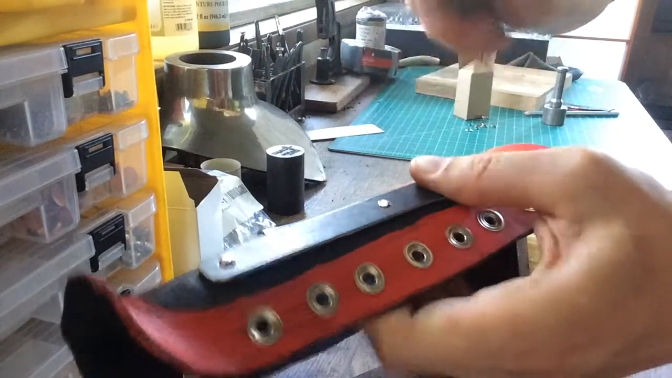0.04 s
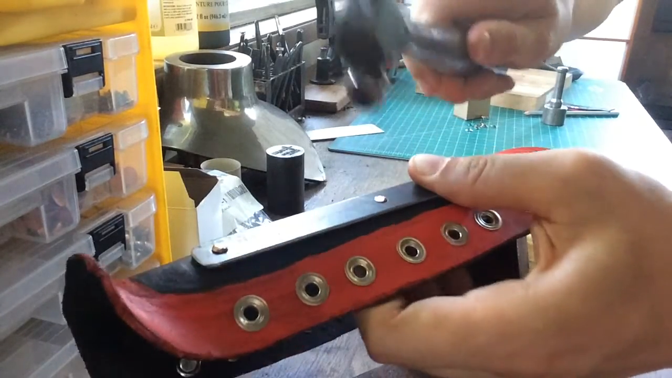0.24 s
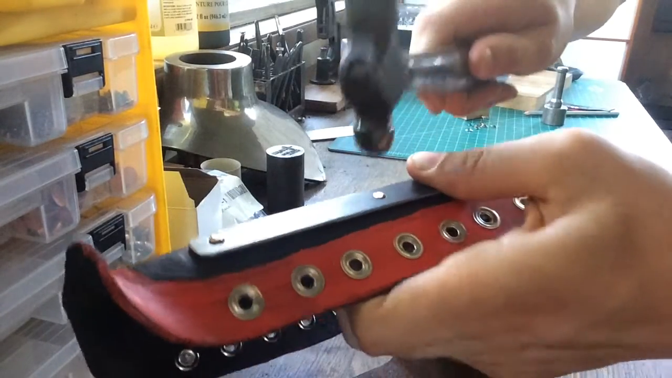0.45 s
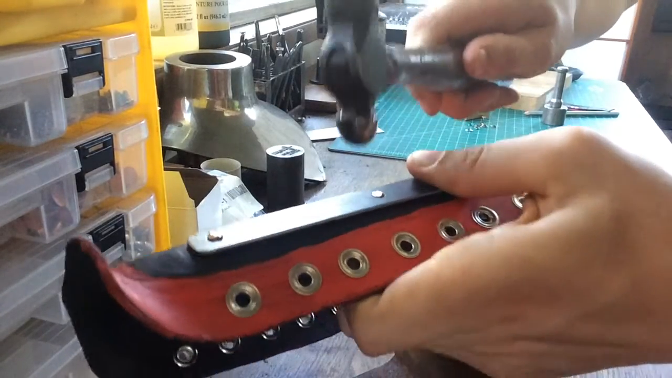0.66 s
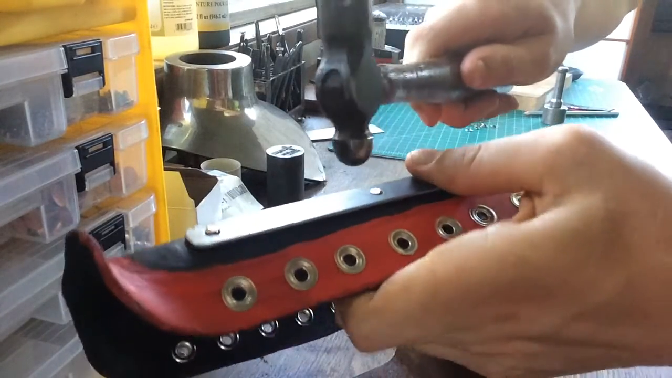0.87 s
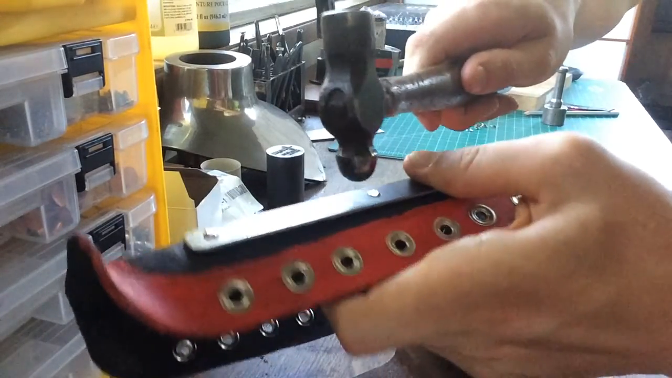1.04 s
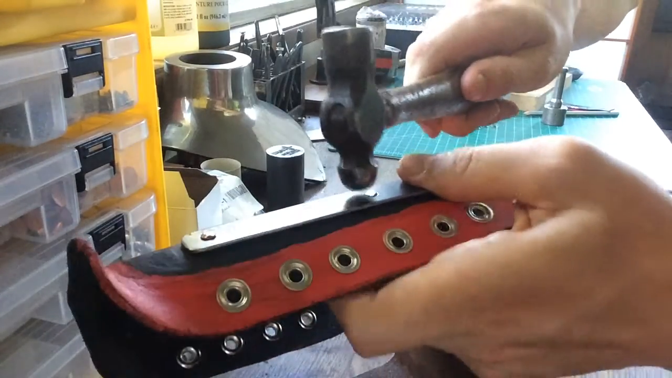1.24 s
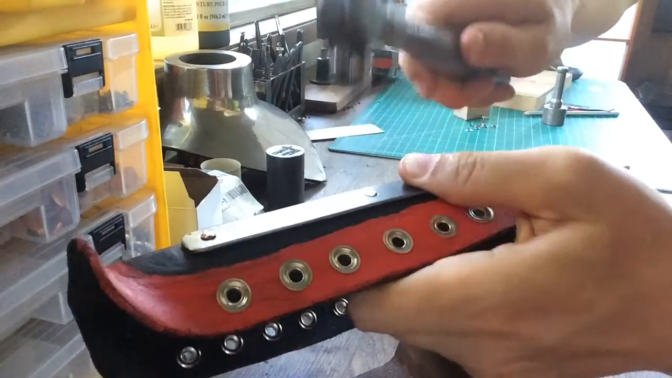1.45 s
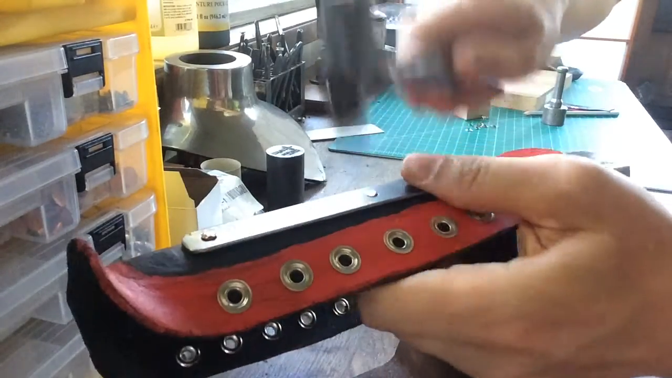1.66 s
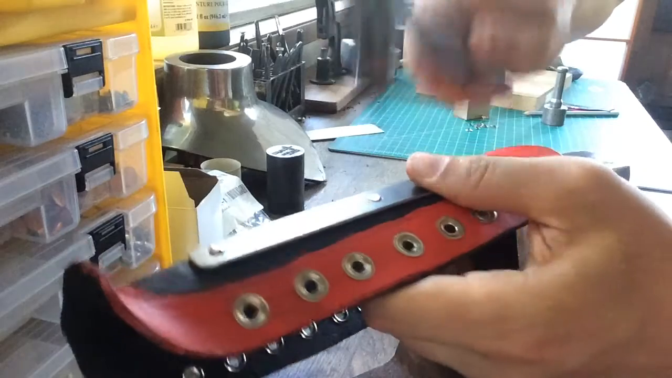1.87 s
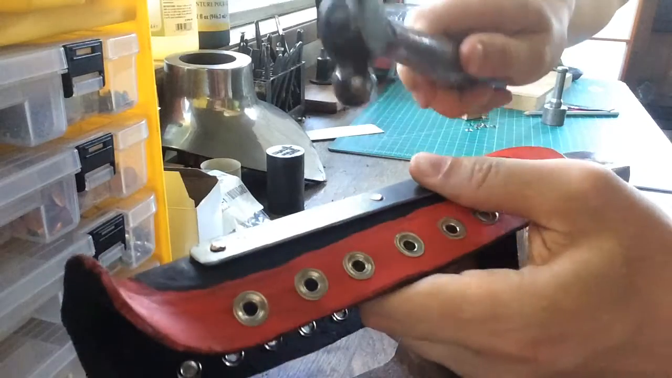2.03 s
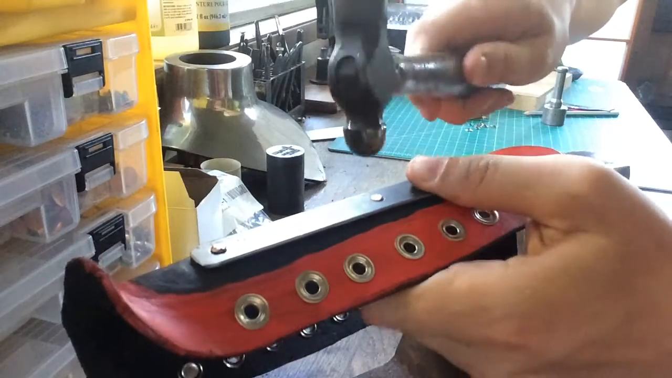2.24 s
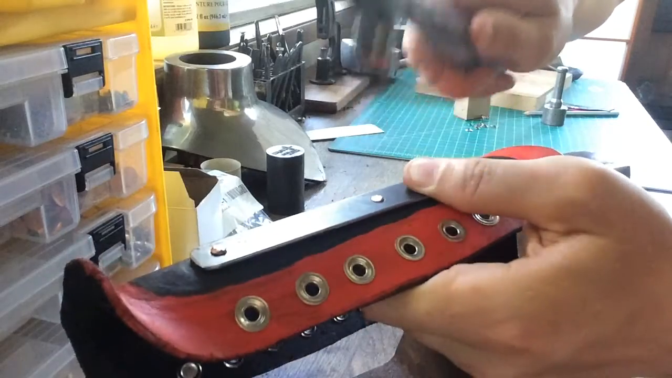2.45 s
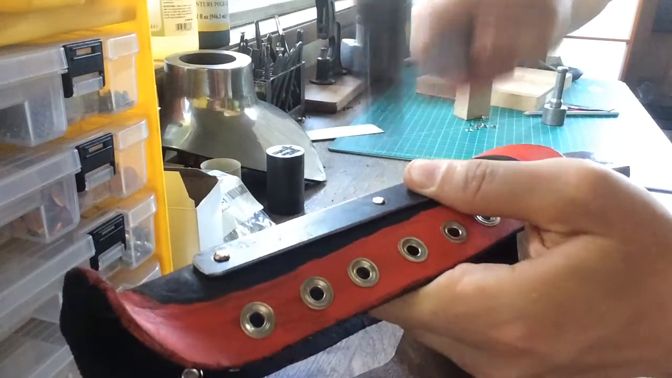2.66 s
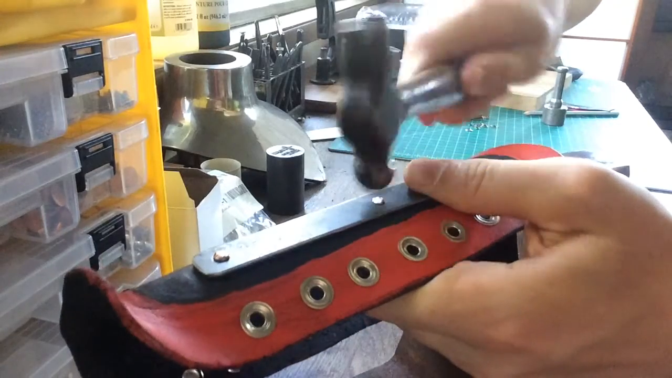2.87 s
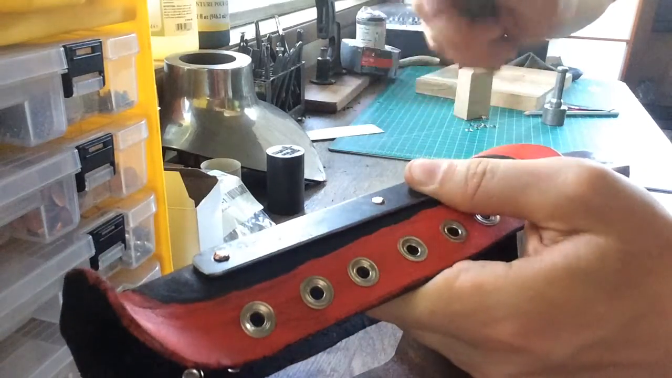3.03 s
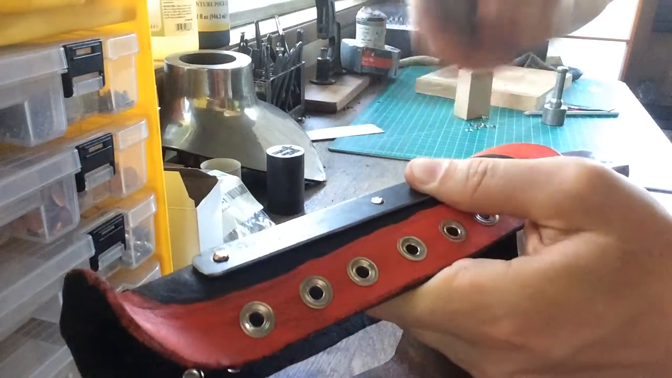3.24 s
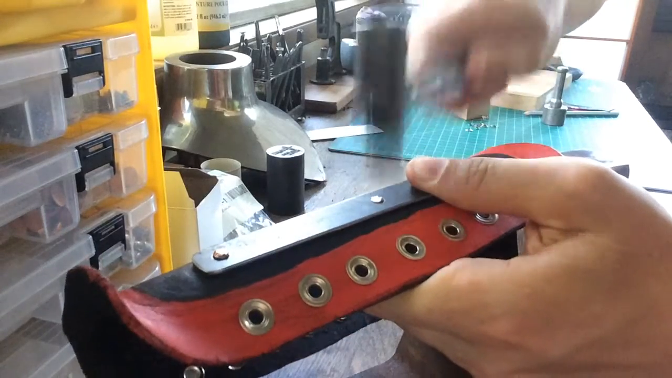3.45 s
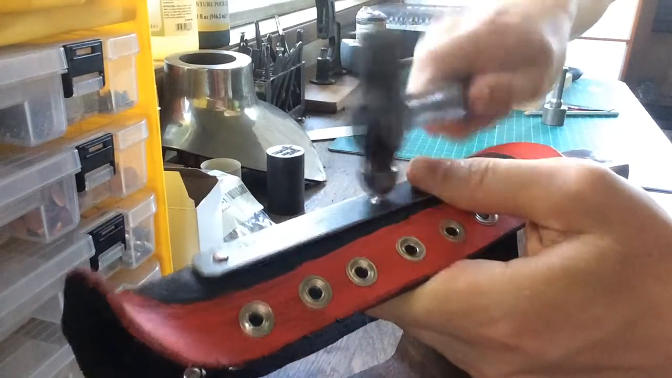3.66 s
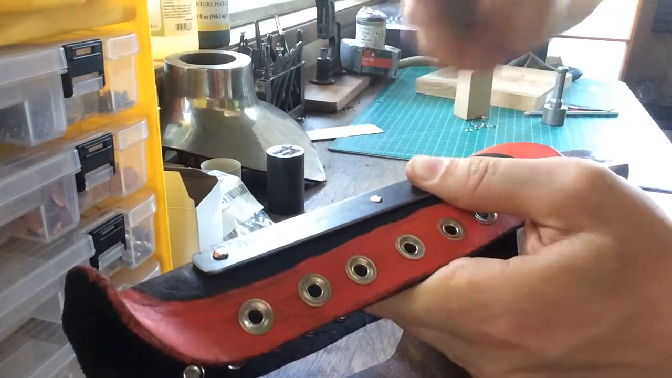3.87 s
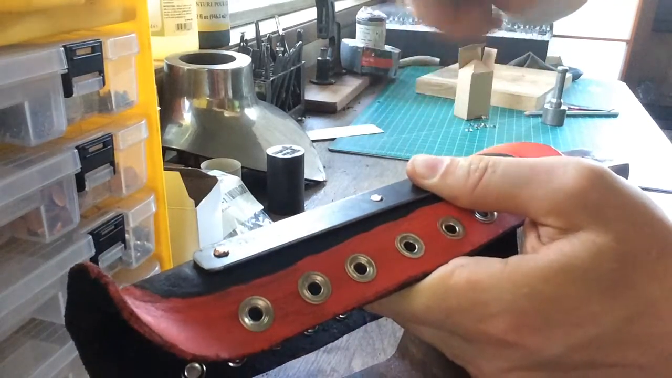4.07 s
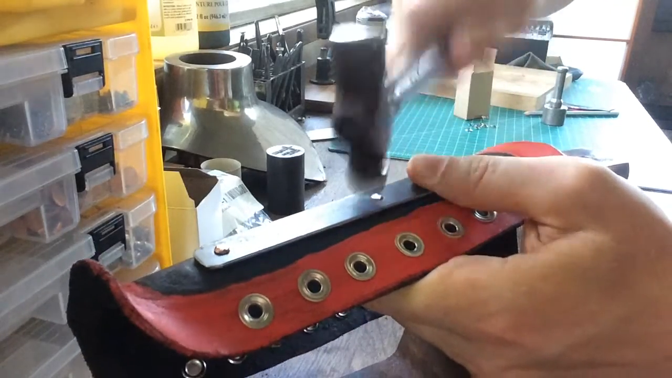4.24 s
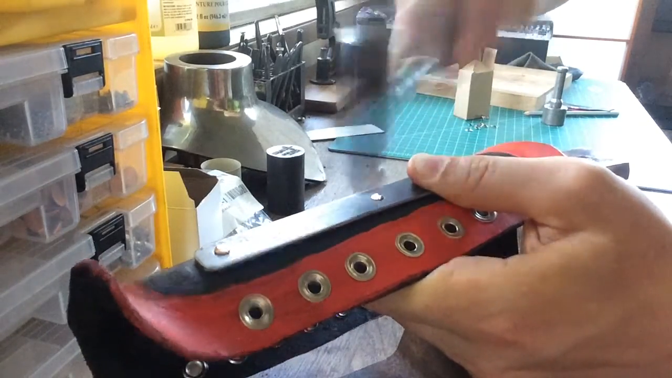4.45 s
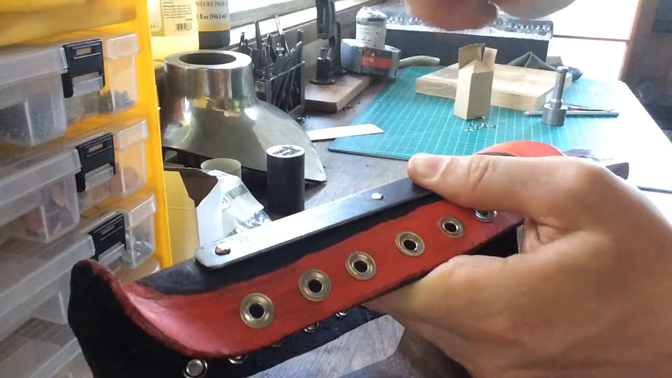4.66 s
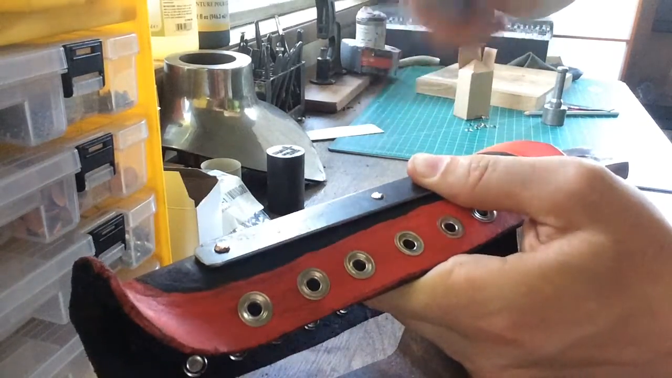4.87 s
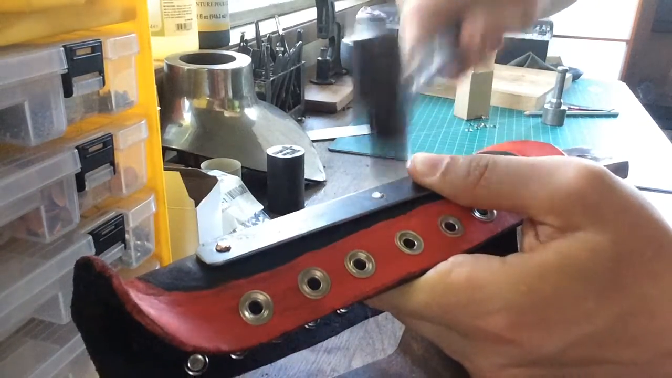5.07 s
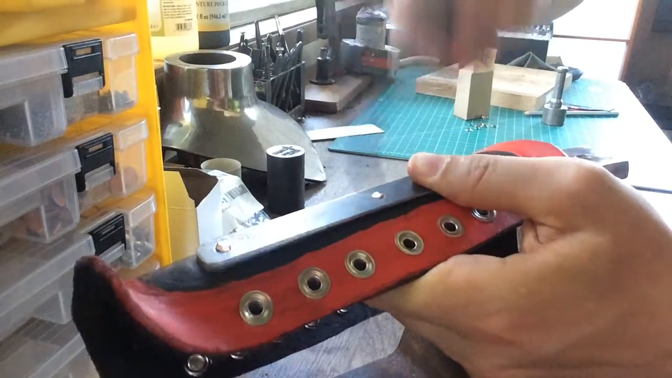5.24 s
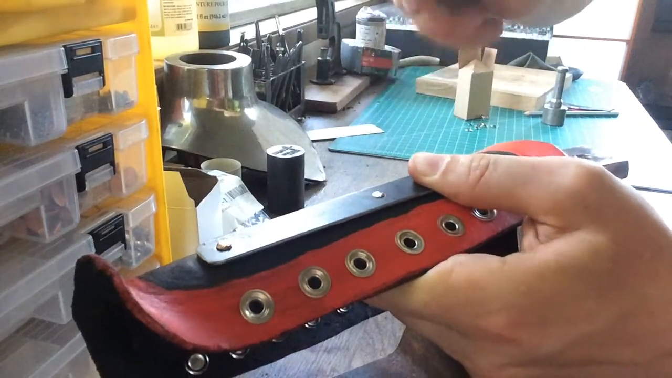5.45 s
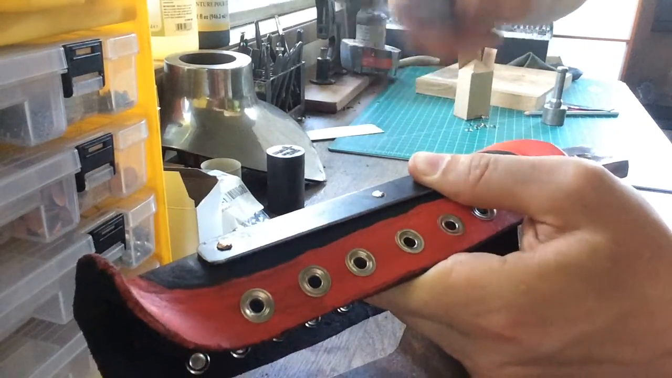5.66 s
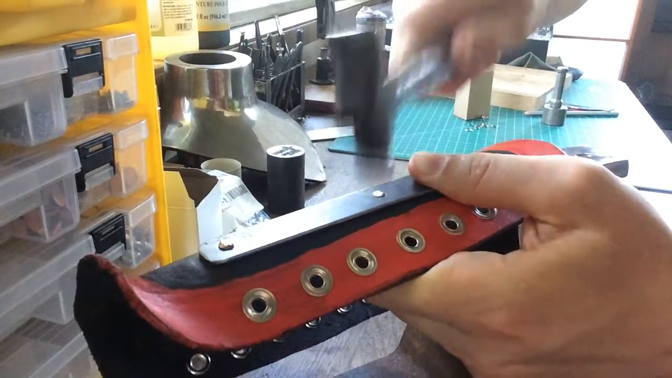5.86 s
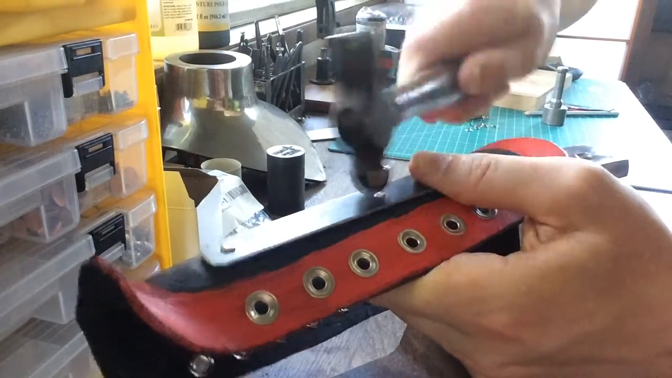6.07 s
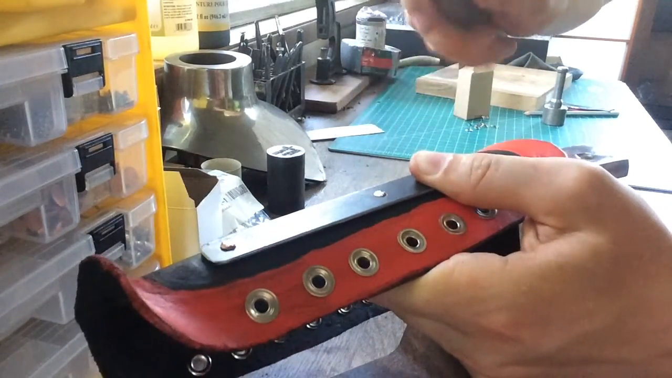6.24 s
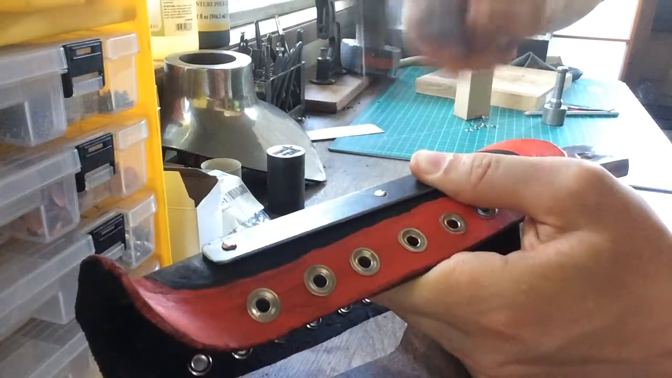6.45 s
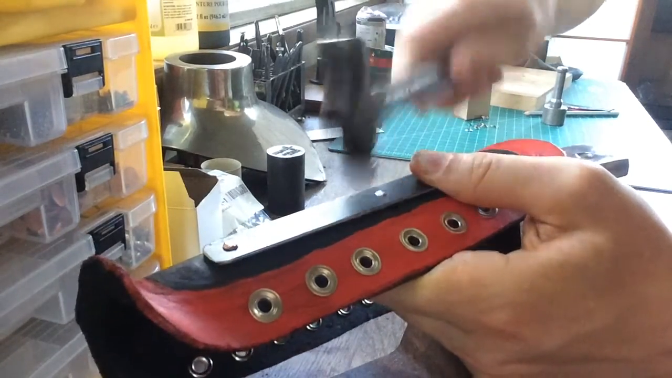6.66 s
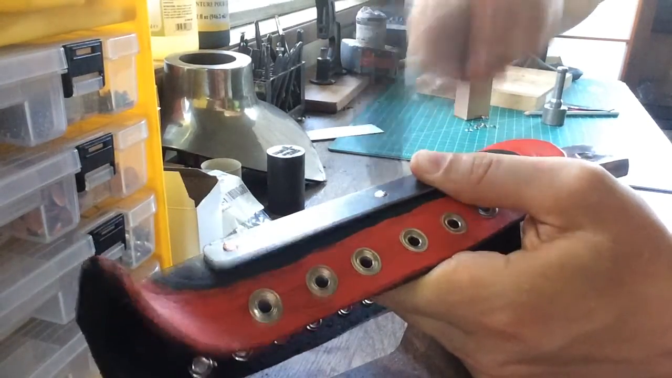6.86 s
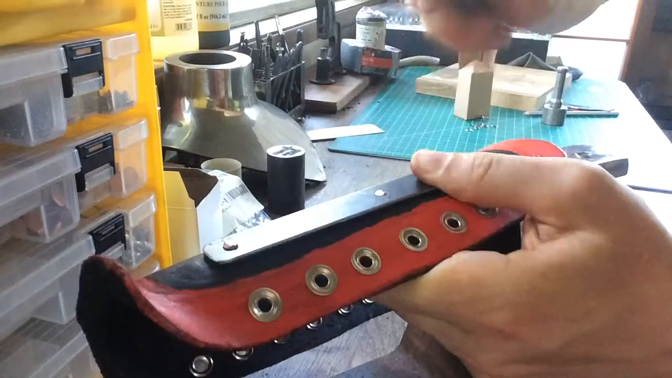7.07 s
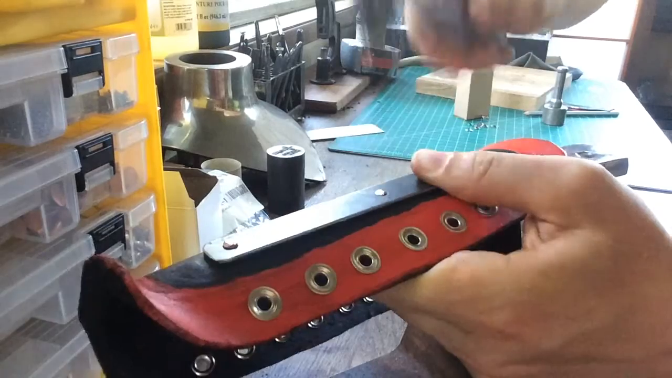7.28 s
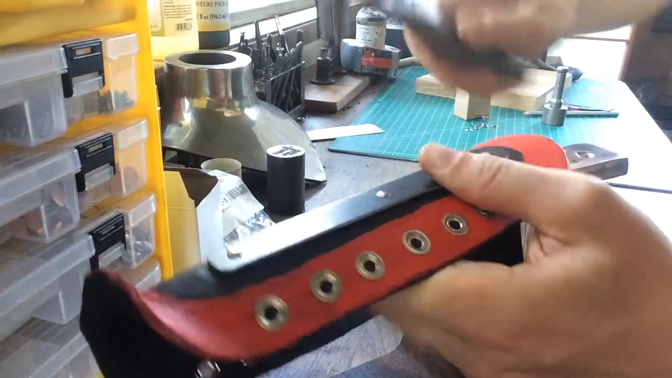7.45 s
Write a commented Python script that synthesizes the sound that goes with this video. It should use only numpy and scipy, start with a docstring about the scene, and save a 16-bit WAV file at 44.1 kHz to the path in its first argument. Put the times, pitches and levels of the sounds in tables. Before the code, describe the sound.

In a small workshop, the tail of a hammer blow dies away, followed by soft bumps and tiny metal scrapes. A faint touch and a light tap lead to two firmer, lower-pitched knocks, then steady hard blows nearly four times a second until the end. Each is a bright crack and damped clank with a short rebound. The microphone is close, its loud peaks held down.

```python
"""In a workshop, a ball-peen hammer sets a copper rivet through a steel plate and leather, held on the horn of
a small bench anvil. One blow dies away, the work is nudged, then three trial taps lead to a steady run of blows.
Each is a noise-burst crack and clank, damped modes of plate, anvil, hammer and bench, and a small rebound.
The workshop answers with decaying noise, over quiet air; the close microphone's limiter holds the peaks down."""
import sys
import numpy as np
from scipy import signal
from scipy.fft import rfft, irfft, next_fast_len
from scipy.io import wavfile
from scipy.ndimage import uniform_filter1d, minimum_filter1d, map_coordinates

SR = 44100
rng = np.random.default_rng(int(sys.argv[2]) if len(sys.argv) > 2 else 0)


def master(y):
    """Save y as 16-bit WAV."""
    cut = np.clip(np.atleast_2d(y).T, -1, 1)
    pcm = np.round(cut * 32767)  # scale
    wavfile.write(sys.argv[1], SR, pcm.astype(np.int16))


N = 331191
T = np.arange(int(SR * .6)) / SR  # s, time axis of every single sound

# Reference levels of an ordinary blow; each sound adds its own offset.
KNOCK_DB, THUD_DB, BENCH_DB, CLANK_DB, CRACK_DB, ROOM_DB = -16, -27, -26, -18.5, -35, -34


def amp(db):
    """Decibels to gain."""
    return 10 ** (np.asarray(db) / 20)


def along(points, hz):
    """(Hz, value) points read on a log axis."""
    point_hz, value = np.transpose(points)
    return np.interp(np.log(hz + 1), np.log(point_hz), value)


def filtered(x, gain):
    """x times a gain that depends on frequency."""
    size = next_fast_len(len(x) + 8192)
    hz = np.fft.rfftfreq(size, 1 / SR)
    return irfft(rfft(x, size) * gain(hz), size)[:len(x)]


def ripple(depth_db, step_hz):
    """A random gain over frequency: no two blows stir the same modes."""
    knots = rng.standard_normal(int(SR / step_hz) + 2)
    return lambda hz: amp(depth_db * np.interp(hz / step_hz, np.arange(len(knots)), knots))


def wobble(rate_hz, size):
    """A smooth random curve, rate_hz knots a second."""
    knots = rng.standard_normal(int(size * rate_hz / SR) + 4)
    return map_coordinates(knots, [np.arange(size) * rate_hz / SR])


def noise(spectrum, size, ripple_db=0):
    """Coloured noise of rms 1."""
    uneven = ripple(ripple_db, step_hz=68.38)
    x = filtered(rng.standard_normal(size), lambda hz: amp(along(spectrum, hz)) * uneven(hz))
    return x / x.std()


def fade(t60_s, attack_s):
    """A quick swell and an exponential decay."""
    decay = np.exp(-np.log(1000) * T / t60_s)
    return decay * (1 - np.exp(-T / attack_s))


def burst(spectrum, t60_s, attack_s):
    """Many close modes that die together."""
    return noise(spectrum, len(T), ripple_db=5.5) * fade(t60_s, attack_s)


def mode(hz, t60_s, attack_s):
    """One damped vibration."""
    return np.sin(2 * np.pi * hz * T) * fade(t60_s, attack_s)


def ring(modes, scatter_db, attack_s):
    """A body's modes: where the blow lands and how the hand grips shift their strength and pitch."""
    total = np.zeros(len(T))
    for hz, db, t60_s in modes:
        strength = amp(db + scatter_db * rng.normal()) * rng.choice([-1, 1])
        total += strength * mode(hz * rng.normal(1, .002), t60_s, attack_s)
    return total


def add(track, s, x):
    """Mix x into the track from time s."""
    i = round(s * SR)
    x = x[max(-i, 0):max(N - i, 0)]
    track[max(i, 0):][:len(x)] += x


# Spectrum of steel on copper. Each row: frequency in Hz, density in dB per Hz.
CRACK_SPECTRUM = [(500, -26), (2000, -13), (4000, 0), (7000, 3.5), (11000, 0.5), (15000, -4)]


def crack(track, s, crack_db):
    """Steel meets copper: a short bright burst and one high mode."""
    add(track, s, amp(crack_db + 14) * burst(CRACK_SPECTRUM, t60_s=.014, attack_s=.0004))
    add(track, s + .001, amp(crack_db + 10.5) * mode(3900, t60_s=.018, attack_s=.0004))


HEAD_DB = -7.5  # against the mean of the crack and room levels
# The hammer head. Each row: frequency in Hz, level in dB, t60 in s.
HEAD_MODES = [(5625, -12, .3), (5965, -1, .16), (6110, -4, .14), (6820, -1, .2), (7553, -4, .15),
              (7827, -3, .1), (8325, -8, .22), (9827, -2, .24), (11886, -7, .26)]


def hammer_head(track, s, room_db, crack_db):
    """The hammer head rings in its own high modes."""
    db = (room_db + crack_db) / 2 + HEAD_DB
    add(track, s, amp(db) * ring(HEAD_MODES, scatter_db=3, attack_s=.0005))


PING_DB, PING_SCATTER_DB = -68, 4  # reference level and its scatter from blow to blow


def ping(track, s, force_db):
    """A thin ping in the steel that comes and goes from blow to blow."""
    ping_db = PING_DB + force_db + PING_SCATTER_DB * rng.normal()
    add(track, s, amp(ping_db + 20) * mode(4650, t60_s=.36, attack_s=.0005))


def thud(track, s, thud_db):
    """A low thud goes into the bench."""
    add(track, s + .00042, amp(thud_db + 11.5) * mode(165, t60_s=.027, attack_s=.0025))


# Spectrum of the clank. Each row: frequency in Hz, density in dB per Hz.
CLANK_SPECTRUM = [(500, -6.5), (950, 1.5), (1200, -5.5), (1900, -6), (3500, -19.5), (5000, -15.5),
                  (9000, -32)]
# The steel plate, pressed against the leather. Each row: frequency in Hz, level in dB, t60 in s.
PLATE_MODES = [(1528, -2, 0.027), (2016, 0, 0.012), (2680, -3.5, 0.016), (3460, -1.5, 0.0097),
               (4505, -3.5, 0.0084)]


def clank(track, s, clank_db):
    """The plate clanks, soon damped by leather and hand."""
    add(track, s + .0005, amp(clank_db + 6) * burst(CLANK_SPECTRUM, t60_s=.027, attack_s=.00047))
    add(track, s + .0013, amp(clank_db + 3.5) * ring(PLATE_MODES, scatter_db=1, attack_s=.0003))


PUSH_DB, PUSH_HZ, SPRING_BACK_S = 5.5, 410, .0105  # push level is over the bench level
# The bench top. Each row: frequency in Hz, level in dB, t60 in s.
BENCH_MODES = [(116, -13, .35), (143, -11, .4), (200, -11, .3), (314, -2, .33), (339, -2, .27),
               (416, -7, .2), (520, -2, .11), (680, -4, .1), (902, -7, .1)]


def bench(track, s, bench_db, room_db):
    """The bench gives, springs back against the anvil and drones on in its modes."""
    add(track, s + .00091, amp(bench_db + PUSH_DB) * mode(PUSH_HZ, t60_s=.013, attack_s=.00092))
    add(track, s + SPRING_BACK_S, amp(bench_db + 11) * mode(408, t60_s=.054, attack_s=.00016))
    add(track, s + SPRING_BACK_S, amp(bench_db + 6.5) * mode(566, t60_s=.025, attack_s=.00055))
    add(track, s + .00395, amp(room_db + 11) * ring(BENCH_MODES, scatter_db=2.5, attack_s=.003))


USUAL_KNOCK_HZ, KNOCK_DB_PER_OCTAVE = 739, 3


def knock(track, s, knock_db, hz):
    """The anvil knocks on its seat, its pitch set by how firmly the work lies; a deeper knock is louder."""
    deeper_octaves = np.log2(USUAL_KNOCK_HZ / hz)
    level_db = knock_db + 12 + KNOCK_DB_PER_OCTAVE * deeper_octaves
    add(track, s + .001, amp(level_db) * mode(hz, t60_s=.027, attack_s=.0008))


# The anvil, damped by the leather. Each row: frequency in Hz, level in dB, t60 in s.
ANVIL_MODES = [(1333, -11, .09), (1448, -12, .16), (1575, -6, .06), (2005, -5, .07), (2358, -13, .08),
               (2894, -11, .11), (3220, -15, .07), (4430, -16, .07), (4620, -19, .08)]


def anvil(track, s, room_db):
    """The anvil's own modes, driven through the leather."""
    add(track, s + .001014, amp(room_db + 14.5) * ring(ANVIL_MODES, scatter_db=3, attack_s=.00018))


# Spectrum of the workshop's answer. Each row: frequency in Hz, density in dB per Hz.
TAIL_SPECTRUM = [(25, -23.5), (60, -2), (130, -2), (300, 8), (600, 5.5), (1000, 0), (1600, -2.5),
                 (3000, -7.5), (5300, -17.5), (8000, -21), (12000, -24), (15000, -25)]
# How fast the workshop's answer dies. Each row: frequency in Hz, t60 in s.
WORKSHOP_DECAY = [(60, 0.32), (160, 0.43), (420, 0.32), (1100, 0.46), (3000, 0.41), (7500, 0.44),
                  (15000, 0.3)]


def room_tail(build_s, clump_db):
    """Echoes arrive in clumps, and each frequency dies at its own speed."""
    steady = noise(TAIL_SPECTRUM, len(T), ripple_db=2)
    hz, t, bands = signal.stft(steady, SR, nperseg=256)
    decay = np.exp(-np.log(1000) * t / along(WORKSHOP_DECAY, hz)[:, None])
    tail = signal.istft(bands * decay, SR, nperseg=256)[1][:len(T)]
    return tail * (1 - np.exp(-T / build_s)) * amp(clump_db * wobble(240, len(T)))


# Spectrum of the hanging bass. Each row: frequency in Hz, density in dB per Hz.
BOOM_SPECTRUM = [(30, -22.5), (70, 2.5), (130, 0), (250, -4.5), (400, -5), (900, -41.5)]


def room(track, s, room_db, crack_db, thud_db):
    """The room answers: a sharper crack leaves more treble hanging in it, a heavier thud more bass."""
    add(track, s + .003, amp(room_db + 12.5) * room_tail(build_s=.0025, clump_db=-1))
    add(track, s + .0028, amp(crack_db - 14.5) * burst(CRACK_SPECTRUM, t60_s=.41, attack_s=.0024))
    add(track, s + .008, amp(thud_db - 9) * burst(BOOM_SPECTRUM, t60_s=.31, attack_s=.0047))


# Copper yields this far below an ordinary blow; under that, contact grows by the slope.
YIELD_DB, CONTACT_DB_PER_FORCE_DB = 9.5, .8
# What goes into the bench as a thud is missing from the knock.
KNOCK_LOSS_DB_PER_THUD_DB, BENCH_GAIN_DB_PER_THUD_DB = .25, .33
# The blows; force, thud and crack are relative to an ordinary blow of the run.
# Each row: start in seconds, force in dB, knock in Hz, thud in dB, crack in dB.
BLOWS = [(-.125, -3.5, 718, 5, 8), (1.007, -46, 650, 4, -2), (1.2718, -27.5, 435, 6, 10),
         (1.6719, -9.5, 440, 4.5, -1), (2.6481, -7.5, 474, 10, 5.5), (2.926, -.5, 710, 1, -11),
         (3.2004, 1, 712, -3, -9), (3.4641, 1.5, 715, -8, -1), (3.732, 1.5, 696, -5, -2),
         (3.9972, -.5, 756, -4, 0), (4.278, 0, 705, 0, 3.5), (4.543, -1, 720, -1, -2),
         (4.8092, -3, 667, 12, 6), (5.0751, -3, 748, 4, -10), (5.3457, -1, 708, -11, 6),
         (5.605, .5, 733, 2, 7), (5.8743, 1, 726, 3, 4), (6.136, .5, 743, -6, -1), (6.405, .5, 715, -9, 5),
         (6.6771, -1, 590, 9, 0), (6.9622, -1, 780, 10, -7), (7.2234, 0, 590, 9, 7)]


def hammer():
    """Each blow runs from rivet through anvil into bench and room; yielding copper caps the contact."""
    out = np.zeros(N)
    for s, force, knock_hz, thud_extra, crack_extra in BLOWS:
        contact = CONTACT_DB_PER_FORCE_DB * min(force + YIELD_DB, 0)
        crack_db = CRACK_DB + contact + crack_extra
        thud_db = THUD_DB + contact + thud_extra
        room_db = ROOM_DB + force
        crack(out, s, crack_db)
        hammer_head(out, s, room_db, crack_db)
        ping(out, s, force)
        thud(out, s, thud_db)
        clank(out, s, CLANK_DB + contact)
        bench(out, s, BENCH_DB + contact + BENCH_GAIN_DB_PER_THUD_DB * thud_extra, room_db)
        knock(out, s, KNOCK_DB + contact - KNOCK_LOSS_DB_PER_THUD_DB * thud_extra, knock_hz)
        anvil(out, s, room_db)
        room(out, s, room_db, crack_db, thud_db)
    return out


HOP_S = .017  # flight after a usual knock
REBOUND_DB, REBOUND_DB_PER_FORCE_DB, REBOUND_DB_PER_CRACK_DB = -28, .58, .44


def bounces():
    """A lighter, bright second contact with some plate; a firmer seat throws the hammer higher."""
    out = np.zeros(N)
    for s, force, knock_hz, _, crack_extra in BLOWS:
        lands_s = s + HOP_S * knock_hz / USUAL_KNOCK_HZ
        db = REBOUND_DB + REBOUND_DB_PER_FORCE_DB * force + REBOUND_DB_PER_CRACK_DB * crack_extra
        add(out, lands_s, amp(db + 3) * burst(CRACK_SPECTRUM, t60_s=.035, attack_s=.0002))
        add(out, lands_s, amp(db + 3) * ring(PLATE_MODES, scatter_db=1, attack_s=.00014))
    return out


# Spectrum of the workshop air. Each row: frequency in Hz, density in dB per Hz.
AIR_SPECTRUM = [(20, -15), (50, 1.5), (100, 9), (200, -7.5), (420, -3), (900, -12.5), (3000, -16),
                (5500, -18), (8000, -23.5), (12000, -24.5), (15000, -40)]


def workshop_air():
    """Quiet coloured noise, slightly restless in level."""
    return amp(-69 + 1.3 * wobble(6, N)) * noise(AIR_SPECTRUM, N)


# The work shifts on the horn and the hammer grazes it.
# Each row: start in seconds, bump in dB, tick in dB.
NUDGES = [(.133, -43, -72), (.165, -56, -62), (.298, -70, -57), (1.023, -60, -56), (2.138, -60, -68),
          (2.428, -62, -74)]


def handling():
    """Soft bumps into the bench and small scrapes of steel as the leather is lined up."""
    out = np.zeros(N)
    for s, bump_db, tick_db in NUDGES + fidgets(count=4):
        add(out, s, amp(bump_db + 2) * mode(118, t60_s=.15, attack_s=.0025))
        add(out, s, amp(bump_db + 7.5) * mode(470, t60_s=.016, attack_s=.00016))
        add(out, s, amp(bump_db - 14) * burst(BOOM_SPECTRUM, t60_s=1.0, attack_s=.0034))
        add(out, s, amp(tick_db + 6.5) * burst(CLANK_SPECTRUM, t60_s=.048, attack_s=.0022))
        add(out, s + .003, amp(tick_db + 5) * ring(PLATE_MODES, scatter_db=2, attack_s=.002))
    return out


FIDGET_FROM_S, FIDGET_TO_S = .9, 2.6
FIDGET_BUMP_DB, FIDGET_TICK_DB, FIDGET_SCATTER_DB = -66, -73, 2


def fidgets(count):
    """Faint nudges at chance moments, one per equal slot: rows of (s, bump dB, tick dB)."""
    places = (np.arange(count) + rng.random(count)) / count
    times_s = FIDGET_FROM_S + (FIDGET_TO_S - FIDGET_FROM_S) * places
    levels_db = rng.normal([FIDGET_BUMP_DB, FIDGET_TICK_DB], FIDGET_SCATTER_DB, (count, 2))
    return list(np.column_stack([times_s, levels_db]))


def scene():
    """Hammering, rebounds and handling over the air of the workshop."""
    return (hammer() + bounces() + workshop_air() + handling())[None]


def limited(x, ceiling_db, size):
    """The gain ducks just ahead of each peak and comes back at once; size is in samples."""
    needed = np.minimum(1, amp(ceiling_db) / (np.abs(x) + 1e-9))
    return x * uniform_filter1d(minimum_filter1d(needed, size), size)


TOP_HZ = 15300


def record(dry):
    """A fast limiter, then the microphone's bass roll-off and the band limit."""
    held = limited(dry[0], ceiling_db=-3, size=65)
    bass_cut = signal.butter(2, 32, "highpass", fs=SR, output="sos")
    lean = signal.sosfilt(bass_cut, held)
    return filtered(lean, lambda hz: 1 / np.sqrt(1 + (hz / TOP_HZ) ** 260))[None]


dry = scene()
out = record(dry)
master(out)
```